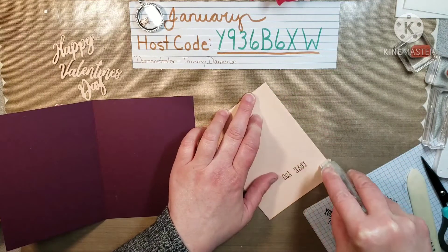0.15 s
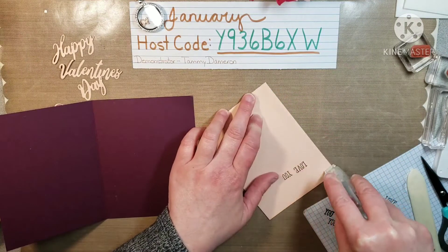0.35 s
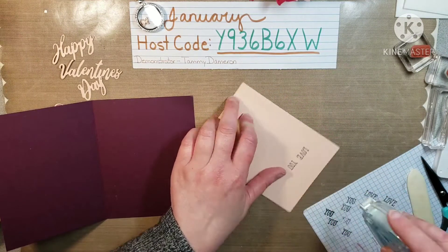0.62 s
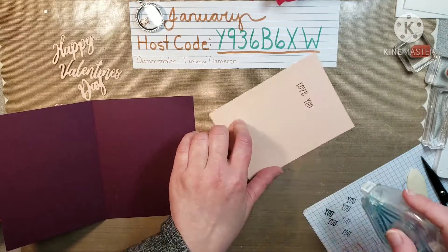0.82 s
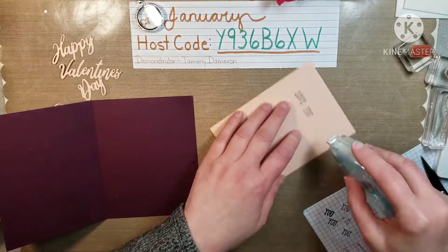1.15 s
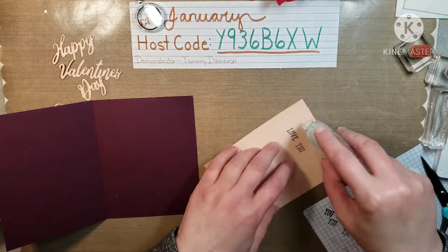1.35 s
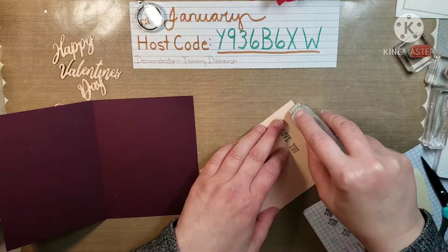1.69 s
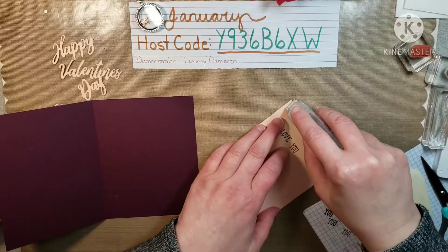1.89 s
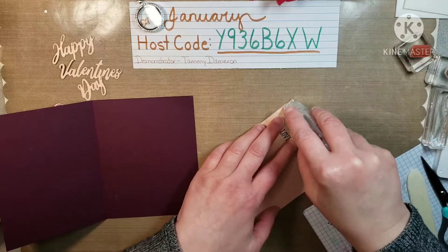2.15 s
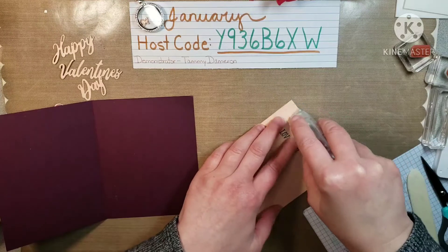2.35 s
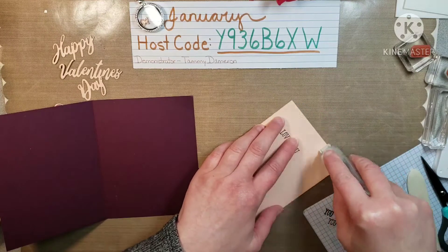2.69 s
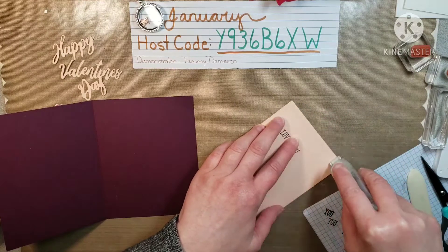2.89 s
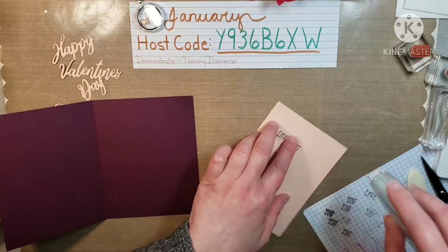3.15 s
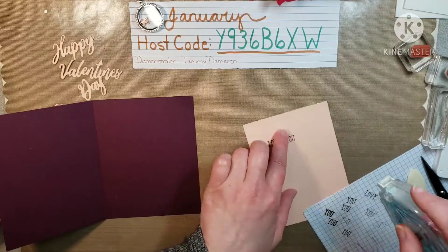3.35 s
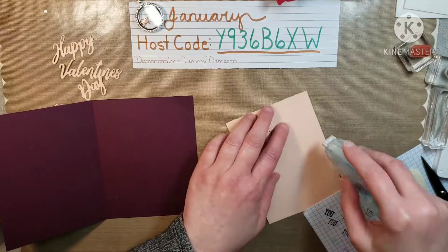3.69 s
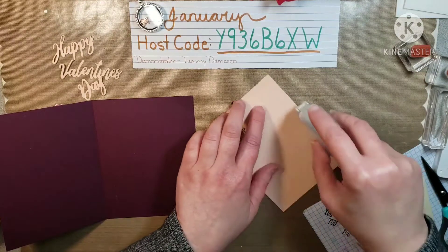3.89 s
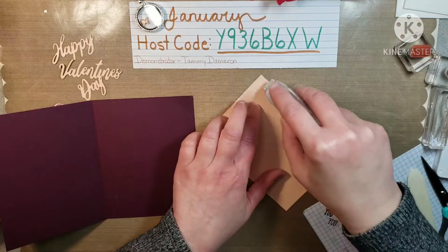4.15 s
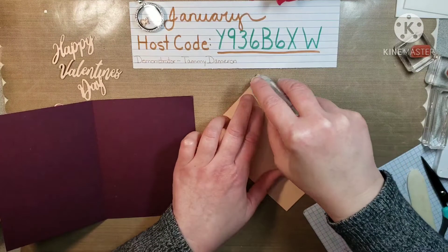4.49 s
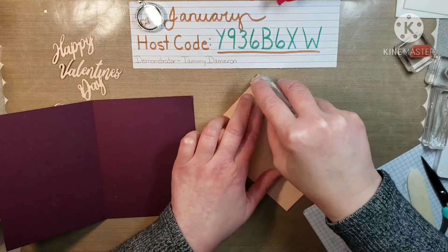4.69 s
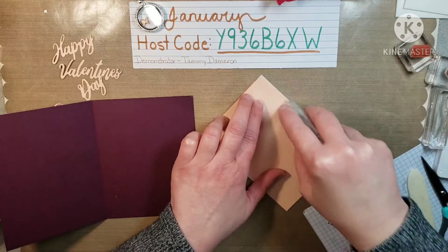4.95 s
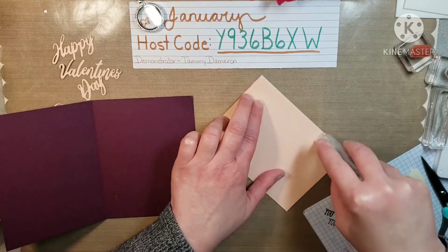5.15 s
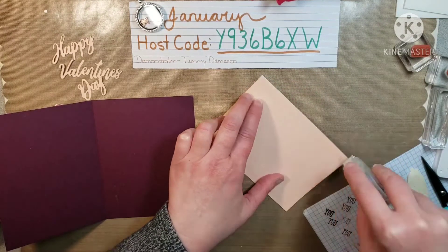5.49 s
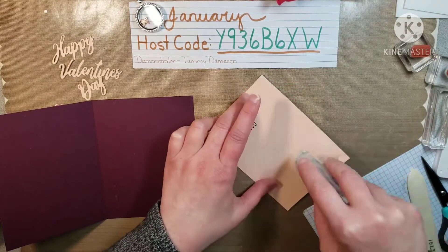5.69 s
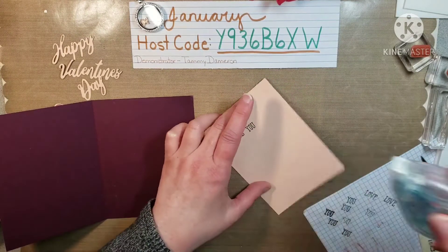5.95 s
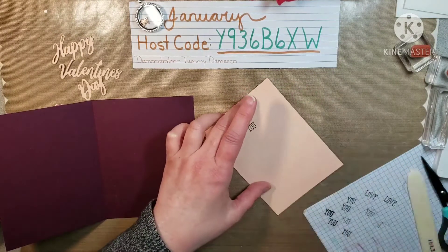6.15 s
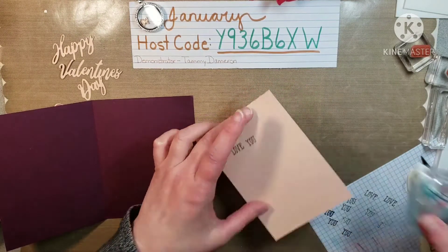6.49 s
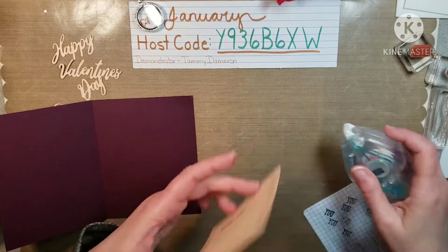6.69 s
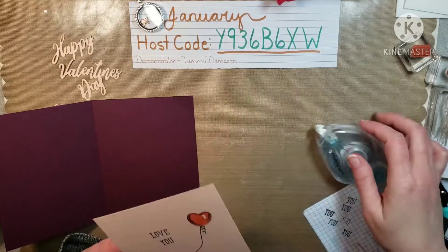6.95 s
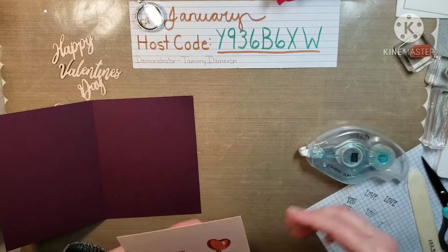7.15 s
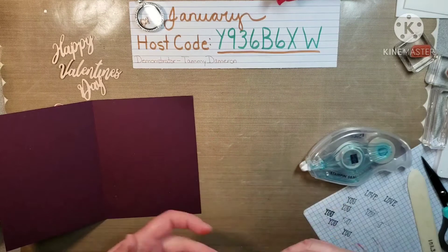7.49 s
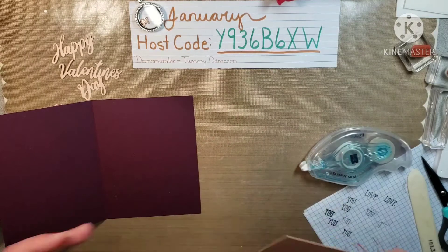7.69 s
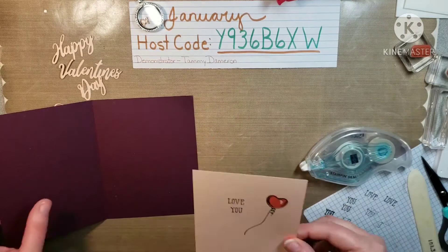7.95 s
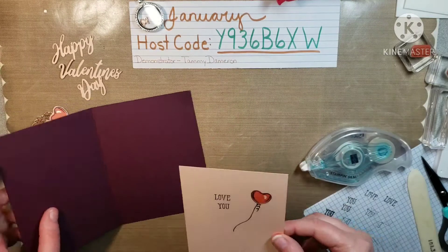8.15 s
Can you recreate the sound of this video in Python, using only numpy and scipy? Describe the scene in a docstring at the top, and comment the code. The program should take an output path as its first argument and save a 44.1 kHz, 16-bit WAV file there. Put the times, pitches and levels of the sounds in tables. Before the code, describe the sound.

Low ventilation rumble fills a room throughout, and the work on a table is heard from close by. A plastic tape runner clicks lightly on and off a card, which is turned with dry, hissy slides from about 0.5 to 1.3 seconds and again from 3 to 4. The runner rolls faintly around 2.3 to 2.8 seconds. A sharp click comes at 4.1 and a soft bump at 4.5, then the clearest scratchy, crackling tape stroke runs from about 4.8 to 5.4. Another sharp click follows at 6. At about 6.9 seconds the runner is put down loudly, rocking and rattling on the table for a moment. A second loud, hard, plastic-sounding knock with a click comes at about 7.5. Everything drops in level after these knocks, and faint card slides and rubbing on the tabletop continue until about 8.4 seconds.

```python
"""Ventilation rumbles in a room as a plastic tape runner rolls along a card on a craft table.
The microphone is close by, on a camera looking down at the work. The roller clicks on and off,
and the card is turned with dry slides. Late on the runner is put down and rocks, and something
else is knocked; the camera's gain control turns everything down after these knocks."""
import sys
import numpy as np
from scipy import signal
from scipy.fft import rfft, irfft, next_fast_len
from scipy.io import wavfile
from scipy.ndimage import uniform_filter1d, map_coordinates

SR = 44100
rng = np.random.default_rng(int(sys.argv[2]) if len(sys.argv) > 2 else 0)


def digitize_waveform(pressure):
    """Quantize a signal to 16-bit integers and store it at the path in sys.argv[1].

    Rows of a 2-D input are taken as channels; values are limited to [-1, 1].
    """
    field = np.atleast_2d(pressure).T
    bounded = np.clip(field, -1, 1)
    quanta = np.round(bounded * 32767).astype(np.int16)
    wavfile.write(sys.argv[1], SR, quanta)


N = 367353

# Table top modes, the first three its thud. Each row: pitch in Hz, level in dB, seconds to fall 60 dB.
TABLE_MODES = [(81, -2, 0.04), (153, -10, 0.079), (196, -12, .12), (343, -14, 0.021), (382, 1.5, 0.08),
               (460, 4.5, 0.056), (518, 2.5, 0.084), (730, -5, 0.033)]


def amp(db):
    """Decibels to gain."""
    return 10 ** (np.asarray(db) / 20)


def unit(x):
    """x at rms 1."""
    return x / np.sqrt(np.mean(x ** 2) + 1e-20)


def peak1(x):
    """x with peak 1."""
    return x / np.max(np.abs(x))


def along(points, hz):
    """Read a curve of (Hz, value) points on a log frequency axis."""
    f, v = np.transpose(points)
    return np.interp(np.log(hz + 1), np.log(f + 1), v)


def wobble(rate):
    """A smooth random curve, rate knots a second."""
    at = np.arange(0, N + 16, 16)
    knots = rng.standard_normal(int(N * rate / SR) + 4)
    return np.interp(np.arange(N), at, map_coordinates(knots, [at * rate / SR]))


def filtered(x, response):
    """x through a complex frequency response."""
    n = x.shape[-1]
    m = next_fast_len(n + min(n // 4, 8192))
    return irfft(rfft(x, m) * response(np.fft.rfftfreq(m, 1 / SR)), m)[..., :n]


def resonance(hz, centre, width):
    """Band-pass response of one resonance, all in Hz."""
    return 1j * hz * width / (centre ** 2 - hz ** 2 + 1j * hz * width)


def rush(spectrum, alike, grit_db):
    """Stereo noise at rms 1, roughened by fine grains; alike gives left-right likeness by frequency."""
    pair = rng.standard_normal((2, N)) * amp(grit_db * wobble(600))
    turn = lambda hz: np.arccos(np.clip(along(alike, hz), -1, 1)) / 2
    mid, side = filtered(pair, lambda hz: amp(along(spectrum, hz)) * [np.cos(turn(hz)), np.sin(turn(hz))])
    return unit(np.array([mid + side, mid - side]))


def pan(left_db):
    """Stereo gains with the left louder by left_db."""
    return amp([[left_db / 2], [-left_db / 2]])


def add(track, s, sound):
    """Lay a stereo sound on the track at s seconds."""
    part = track[:, round(s * SR):][:, :sound.shape[1]]
    part += sound[:, :part.shape[1]]


def swells(rows, roundness=1.43):
    """One gain curve per level column; each rub is 20 dB under its peak at its rise and fall times."""
    peak_s, rise_s, fall_s, *levels_db = np.transpose(rows)[..., None]
    at = np.arange(0, N, 32)
    after = at / SR - peak_s
    under_db = 20 * np.where(after < 0, -after / rise_s, after / fall_s) ** roundness
    powers = [np.sum(amp(db - under_db) ** 2, axis=0) for db in levels_db]
    return [np.interp(np.arange(N), at, np.sqrt(power)) for power in powers]


def patchy(x, depth_db):
    """x with a random gain that differs from band to band and moment to moment."""
    bands = signal.stft(x, nperseg=256)[2]
    field = uniform_filter1d(rng.standard_normal(bands.shape[1:]), 5, axis=0)
    field = uniform_filter1d(field, 9, axis=1)
    return signal.istft(bands * amp(depth_db * unit(field)), nperseg=256)[1][:, :N]


def ring(modes, t):
    """Modes set ringing at new strengths, slightly detuned by where the thing is held."""
    return peak1(sum(amp(db + rng.normal(0, 2.1) - 60 * t / t60)
                     * np.sin(2 * np.pi * hz * rng.normal(1, .025) * t) for hz, db, t60 in modes))


def room(x, wet_db):
    """The direct sound, its echo off the nearest wall and a diffuse tail that dies by band."""
    # Each row: frequency in Hz, seconds for the tail to fall 60 dB.
    decay = [(200, 0.76), (2000, 0.4), (10000, 0.38)]
    # Each row: frequency in Hz, relative level of the tail in dB.
    colour = [(300, -8.5), (2500, 1), (8000, -1)]
    hz, t, bands = signal.stft(rng.standard_normal((2, SR // 4)), SR, nperseg=256)
    fade = amp(along(colour, hz)[:, None] - 60 * t / along(decay, hz)[:, None])
    tail = signal.istft(bands * fade, SR, nperseg=256)[1]
    response = np.pad(tail * amp(wet_db), ((0, 0), (SR // 200, 0)))
    response[:, 0] += 1
    response[:, round(.0115 * SR)] += amp(-17)  # the wall
    return signal.fftconvolve(x, response, axes=1)


def room_tone():
    """Steady duct rumble over a deeper, drifting throb, and microphone hiss."""
    # Spectra of the three noises. Each row: frequency in Hz, relative level in dB.
    duct_spectrum = [(32, -38), (55, -16), (82, 0), (121, -8.5), (140, -17.5), (205, -6), (258, -22.5),
                     (336, -19), (361, -22.5), (457, -16.5), (560, -26.5), (728, -30), (906, -36.5),
                     (1800, -54.5), (2340, -77), (3960, -120)]
    throb_spectrum = [(8, -18), (20, -5.5), (33, 4.5), (50, 4.5), (62, 5.5), (90, -71)]
    hiss_spectrum = [(900, -22.5), (1500, -8), (2700, -8.5), (4750, -12.5), (9000, -16), (12100, -13.5),
                     (15500, -9), (15900, -56.5)]
    # Each row: frequency in Hz, left-right likeness of the rumble (1 is mono).
    duct_alike = [(30, 0.97), (150, 0.99), (300, 0.62), (1500, 0.34)]
    rumble = amp(-37 + 0.92 * wobble(27)) * rush(duct_spectrum, duct_alike, grit_db=-0.5)
    throb = amp(-42 + 3.9 * wobble(0.34)) * rush(throb_spectrum, [(30, 0.86)], grit_db=0)
    hiss = amp(-62 + 2.6 * wobble(1.7)) * rush(hiss_spectrum, [(2000, 0.12), (10000, 0.063)], grit_db=0)
    return pan(1.7) * (rumble + throb) + hiss


def tape_strokes():
    """The roller hums through the case while glue peels off its liner in a crackle."""
    # Pulls of tape. Each row: peak time, rise and fall in seconds, roll and peel levels in dB.
    pulls = [(.074, 0.1, 0.24, -58, -70), (2.29, 0.088, 0.24, -53.5, -68.5), (2.47, 0.016, 0.9, -55, -58),
             (2.66, 0.9, 0.16, -53, -59), (4.77, 0.039, 0.1, -50.5, -54.5), (4.94, 0.24, 0.44, -50, -67),
             (5.03, .022, 0.21, -36.5, -37.5), (5.18, 0.5, 0.17, -44.5, -42),
             (5.37, 0.07, 0.037, -55.5, -49)]
    # Spectra of roller and glue. Each row: frequency in Hz, relative level in dB.
    roll_spectrum = [(940, -34), (1600, -32), (1750, -5.5), (2170, -8.5), (2400, -8.5), (3210, -10),
                     (3520, -12.5), (4110, -17.5), (5290, -5), (5760, -7.5), (10000, -13.5), (13000, -40),
                     (22000, -120)]
    peel_spectrum = [(5000, -13), (7000, -12), (9870, -20.5), (10300, -1.5), (12200, 3.5), (15200, -3),
                     (15800, -52)]
    roll_gain, peel_gain = swells(pulls)
    roll = roll_gain * rush(roll_spectrum, [(2000, 0.4), (8000, 0.085)], grit_db=0.5)
    peel = peel_gain * rush(peel_spectrum, [(10000, .3)], grit_db=3.3)
    return patchy(roll + peel, depth_db=1.8)


def clicks():
    """Roller and card click: a bright snap, a tick at the touched part's pitch, a tap on the table."""
    # Each row: start in seconds, snap and case levels in dB, case pitch in Hz, table level in dB,
    # seconds for snap and tick to fall 60 dB.
    touches = [(0.4182, -35, -34.5, 1980, -28.5, 0.1), (0.7238, -26.5, -26, 4440, -36, 0.039),
               (0.919, -36, -42.5, 1800, -40, 0.081), (1.113, -30.5, -40, 3300, -54, 0.069),
               (1.3763, -20, -23.5, 4820, -37, 0.025), (1.6856, -39, -53, 1270, -52, .014),
               (1.962, -52, -42.5, 1217, -39, .03), (2.2428, -31.5, -36, 1770, -37.5, 0.031),
               (2.2793, -26.5, -28.5, 2400, -41.5, 0.055), (2.4533, -24.5, -49.5, 5480, -56, 0.025),
               (2.7827, -37.5, -68, 2290, -51, 0.04), (3.105, -22.5, -21.5, 3720, -25.5, 0.031),
               (3.118, -26.5, -34.5, 4000, -40, 0.026), (3.915, -37, -47, 6000, -60, 0.012),
               (4.1314, -12, -20, 1740, -24, 0.02), (4.4797, -48.5, -49.5, 1810, -34.5, 0.15),
               (4.7285, -18.5, -50.5, 3970, -41, 0.034), (4.7571, -23.5, -55.5, 4920, -43, 0.0073),
               (4.818, -27, -58, 5000, -60, .015), (4.8326, -21, -30.5, 3520, -51, 0.03),
               (5.02, -33, -43, 3500, -48.5, .02), (5.3843, -33, -44.5, 2200, -47.5, 0.12),
               (5.405, -18, -50, 4800, -41, 0.049), (5.9597, -6, -11.5, 2200, -23.5, 0.033),
               (6.1605, -36, -41, 2230, -49.5, 0.043), (6.4386, -27, -29.5, 2080, -58, 0.057),
               (7.3198, -35, -35.5, 2000, -37, .027), (7.427, -35.5, -33.5, 2200, -44.5, 0.047),
               (7.5097, -4, 2, 2550, -11.5, 0.022)]
    # Each row: frequency in Hz, relative level of the snap in dB.
    snap_spectrum = [(1200, -15.5), (2500, -13), (4000, -11.5), (7000, 1), (9000, -3.5), (12000, 1),
                     (15300, -7), (16000, -27)]
    out, t = np.zeros((2, N)), np.arange(SR // 10) / SR
    for s, snap_db, case_db, case_hz, table_db, t60 in touches:
        bend = 1 - np.exp(-(t / .0011) ** 2)  # the part bends briefly
        crack = .8 * np.exp(-((t - .0014) / .0003) ** 2)  # then lets go
        burst = rng.standard_normal((3, len(t))) * (bend * amp(-60 * t / t60) + crack)
        stereo_burst = burst[:2] + burst[1::-1] / 4
        snap = peak1(filtered(stereo_burst, lambda hz: amp(along(snap_spectrum, hz))))
        tick = peak1(filtered(burst[2], lambda hz: resonance(hz, case_hz, width=.6 * case_hz)))
        # A light touch: only the upper modes, here 1.6 times higher and shorter.
        tap = ring(TABLE_MODES[3:], 1.6 * t) * (1 - np.exp(-t / 0.00013))
        sound = amp(snap_db) * snap + amp(case_db) * tick + amp(table_db) * tap
        add(out, s, room(sound * pan(4.5), wet_db=-39))
    return out


def card_slides(split_hz=9500):
    """Card fibres catch on the table in an uneven rasp; a light, fast slide sizzles more on top."""
    # Each row: peak time, rise and fall in seconds, rasp and sizzle levels in dB.
    slides = [(.545, 0.043, 0.18, -47.5, -40.5), (.675, .07, 0.13, -40, -31.5),
              (.74, 0.065, 0.048, -36.5, -34.5), (.86, 0.073, .05, -49.5, -41.5),
              (1.19, .08, 0.21, -39.5, -36), (1.524, 0.0069, .04, -52.5, -58),
              (3.12, 0.091, 0.33, -40.5, -43), (3.305, 0.078, .05, -40.5, -26.5),
              (3.429, 0.079, .07, -45.5, -37), (3.567, .15, .08, -53, -51), (3.795, 0.14, .09, -45, -39),
              (3.93, 0.034, .13, -50.5, -50.5), (5.45, 0.037, .08, -58, -49),
              (5.585, 0.14, .05, -42.5, -50.5), (5.93, 0.13, .04, -52.5, -69.5),
              (6.01, 0.033, .1, -54, -58), (6.22, 0.11, .05, -49, -59), (6.726, 0.039, .12, -54, -53),
              (7.505, 0.075, .1, -31.5, -54.5), (8.05, .04, 0.26, -51, -77), (8.25, 0.12, .12, -49.5, -56)]
    # Each row: frequency in Hz, relative level of the friction in dB.
    card_spectrum = [(600, -45.5), (1000, -11.5), (2000, -15.5), (4380, -2), (5630, -2), (7250, 1),
                     (10500, -4), (15400, -0.5), (15900, -54.5)]
    rasp_gain, sizzle_gain = swells(slides)
    fibres = rush(card_spectrum, [(2000, 0.29), (10000, 0.085)], grit_db=1.16)
    sizzle = filtered(fibres, lambda hz: 1 / (1 + (split_hz / (hz + 1)) ** 6))
    friction = rasp_gain * (fibres - sizzle) + sizzle_gain * sizzle
    return amp(3.1 * wobble(40)) * pan(1.1) * patchy(friction, depth_db=2.2)


def knocks():
    """A blow rings table and shell and rattles the spools; a longer contact is duller and slower."""
    # Each row: start in seconds, table, thud, shell and rattle levels in dB, contact in milliseconds.
    blows = [(1.117, -43, -11.5, -57, -45, 8.3), (1.925, -34, -48, -41.5, -57.5, 1.6),
             (3.338, -22.5, -21.5, -65, -82, 3.7), (4.483, -15, -21.5, -33, -44, 5),
             (5.396, -49, -19.5, -45, -52, 0.85), (5.997, -28.5, -23, -56, -60, 2.1),
             (6.9151, 0.5, -1, -12, -18.5, 2.15), (6.926, -18.5, -7.5, -8.5, -26.5, 0.59),
             (6.94, -7, -31, -9, -19, 0.45), (6.9763, 1.5, -8, -7.5, -16, 0.28),
             (7.0601, -5, -7.5, -9.5, -13, 1.1), (7.105, -16, -38, -28, -33.5, .8),
             (7.4391, -19, -51, -0.5, -49, 2.2), (7.448, -3.5, -45, 1.5, -48.5, 0.32),
             (7.521, -16.5, -30, -17, -30, 2.2), (7.536, -15.5, -51, -8, -21, 2.2)]
    # The runner's plastic shell. Each row: pitch in Hz, level in dB, seconds to fall 60 dB.
    shell_modes = [(874, -5, 0.032), (1046, 11.5, 0.012), (1230, -10.5, 0.12), (1528, 7, 0.026),
                   (1735, -3, 0.055), (2000, -3.5, 0.047), (2230, -18.5, 0.14), (2645, -11, 0.054),
                   (3050, -21.5, .025), (3215, -25.5, 0.079)]
    rattle_band = lambda hz: hz / (hz + 1500) / (1 + (hz / 5000) ** 2) * (hz < 15700)
    bass_cut = lambda hz: (1j * hz / (1j * hz + 70)) ** 2  # the knocks carry no deep bass
    out, t = np.zeros((2, N)), np.arange(SR // 6) / SR
    for s, table_db, thud_db, shell_db, rattle_db, contact_ms in blows:
        contact_s = contact_ms / 1000
        push = np.hanning(int(contact_s * SR) + 3)
        struck = lambda modes: peak1(np.convolve(ring(modes, t), push)[:len(t)])
        table = -amp(table_db) * struck(TABLE_MODES[3:]) - amp(thud_db) * struck(TABLE_MODES[:3])
        landing = np.exp(-t[:1500] / (3 * contact_s)) * (1 - np.exp(-t[:1500] / contact_s))
        chatter = rng.standard_normal((2, 1500)) * landing  # the shell lands on many points in turn
        chatter = chatter + 0.66 * chatter[::-1]
        shell = peak1(signal.fftconvolve(ring(shell_modes, t)[None], chatter, axes=1)[:, :len(t)])
        rattle = unit(filtered(rng.standard_normal((2, len(t))), rattle_band))
        sound = table + amp(shell_db) * shell + amp(rattle_db - 60 * t / 0.032) * rattle
        add(out, s, room(filtered(sound, bass_cut) * pan(2.1), wet_db=-39.5))
    return out


def table_drag():
    """Pressing while sliding rubs the table top, which hums in its own resonances."""
    # Each row: peak time, rise and fall in seconds, level in dB.
    drags = [(2.27, .03, 0.37, -59.5), (2.59, 0.18, 0.27, -57), (4.96, 0.092, .45, -48.5),
             (7.85, 0.057, 2.2, -46)]
    # The rubbed top as a filter, passed twice. Each row: centre and width in Hz, gain per pass in dB.
    resonances = [(854, 75, 5), (1153, 150, 7.5), (1584, 77, 5), (2105, 450, -3.5)]
    gain, = swells(drags)
    board = lambda hz: sum((-1) ** k * amp(db) * resonance(hz, centre, width)
                           for k, (centre, width, db) in enumerate(resonances))
    friction = rush([(500, 0)], [(1000, 0.56)], grit_db=3.0)
    hum = filtered(friction, lambda hz: board(hz) ** 2)
    return gain * pan(4.2) * unit(hum)


def gain_control(x, loud_db=-21, down_db_per_s=58.5, lag_s=0.089, return_s=2.0):
    """The camera turns down while the sound is loud, with a lag, and slowly comes back up."""
    power = uniform_filter1d(np.mean(x ** 2, axis=0), SR // 50)
    level_db = 10 * np.log10(np.abs(power) + 1e-12)
    loud = 1 / (1 + amp(4 * (loud_db - level_db)))  # a soft switch from 0 to 1
    lag, back = np.exp(-1 / (lag_s * SR)), np.exp(-1 / (return_s * SR))
    lagged = signal.lfilter([1 - lag], [1, -lag], loud)
    down_db = signal.lfilter([down_db_per_s / SR], [1, -back], lagged)
    return x * amp(-down_db)


def scene():
    """The work on the table, heard close up over the room tone."""
    return room_tone() + card_slides() + tape_strokes() + table_drag() + clicks() + knocks()


def record(dry, top_hz=16500):
    """The camera rides the gain, flattens the loudest peaks at full scale and cuts the highest treble."""
    held = gain_control(dry)
    soft = held / (1 + np.abs(held) ** 8) ** (1 / 8)
    return filtered(soft, lambda hz: hz < top_hz)


dry = scene()
out = record(dry)
digitize_waveform(out)
```